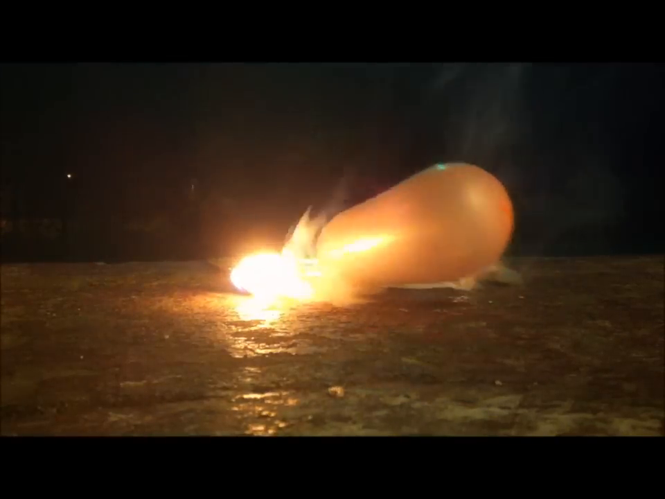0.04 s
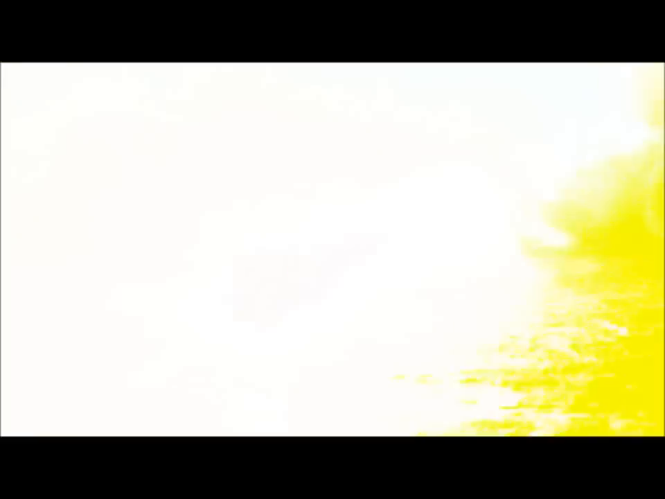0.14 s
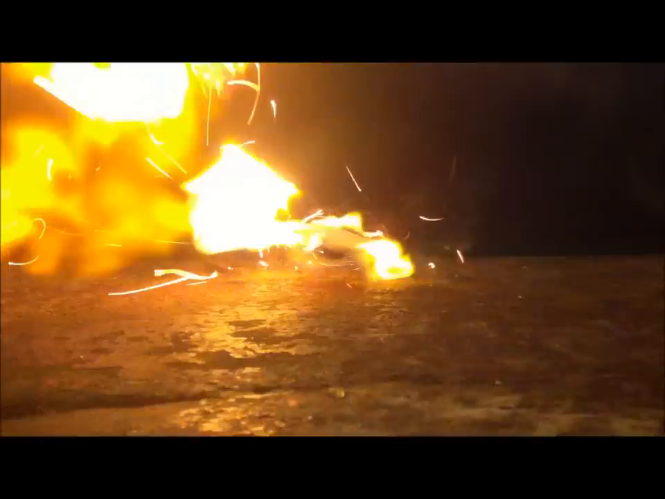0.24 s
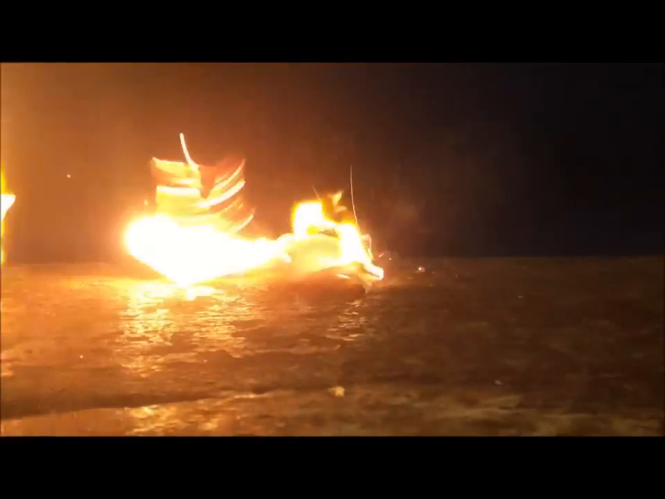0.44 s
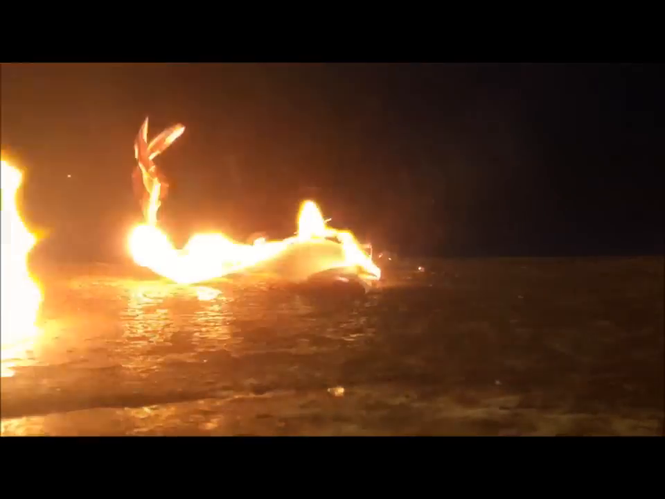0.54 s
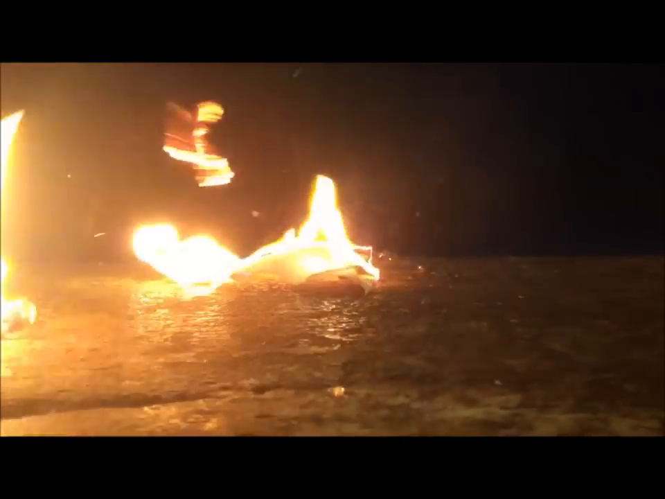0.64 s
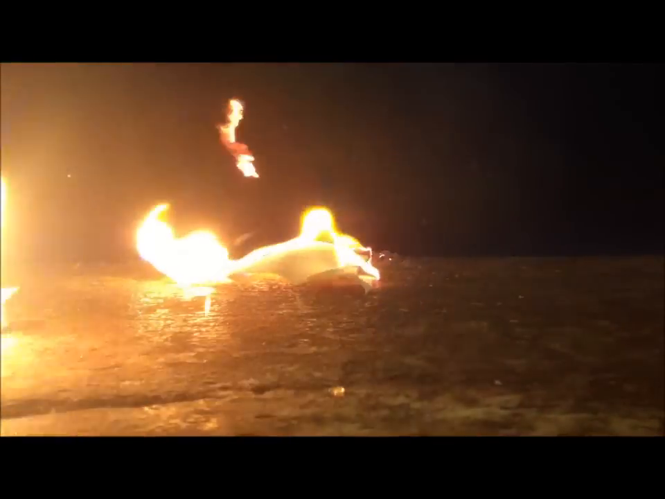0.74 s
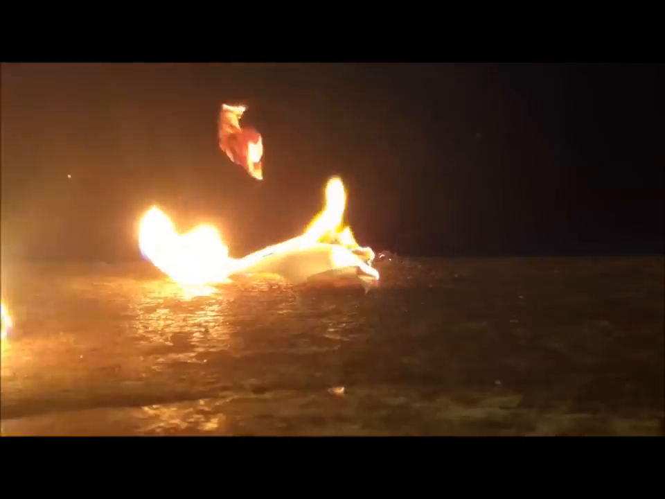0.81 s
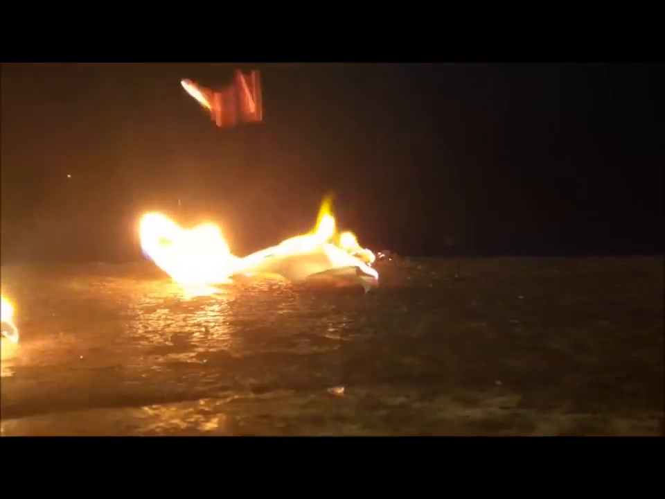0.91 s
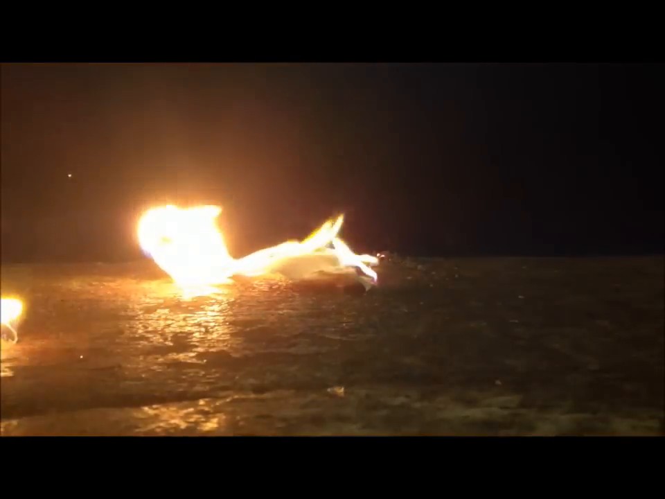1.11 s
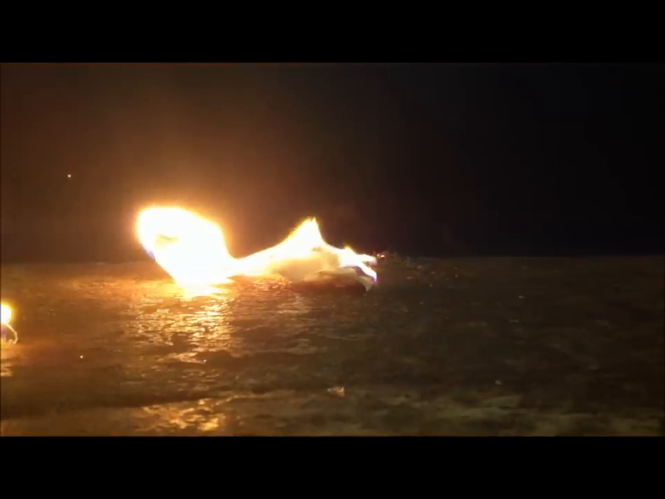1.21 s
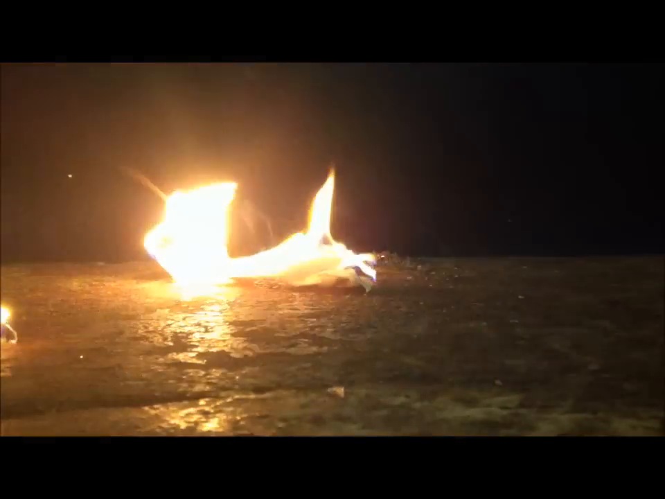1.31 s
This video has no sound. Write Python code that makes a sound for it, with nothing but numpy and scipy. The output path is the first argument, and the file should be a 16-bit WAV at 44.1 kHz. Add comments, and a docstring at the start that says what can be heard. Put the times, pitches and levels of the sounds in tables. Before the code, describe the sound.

A gas balloon explosion in a paved yard: quiet hiss, a sudden cracking bang overloading the microphone, rapid muffled slapbacks and a hollow rumble dying away, then weak low flame flutter as the ducked hiss slowly returns.

```python
"""Microphone hiss over a trace of low flame noise, then a gas balloon bursts into a fireball on wet paving at night.
The skin rips as a decaying sine, noise spits brightly, and push-and-suction pulses overload the microphone.
Walls throw back duller pulses; resonators ring on them, and shaped noise makes the yard's dull tail.
Burning rags flutter as low noise on a level curve.
The gain control ducks everything just ahead of the burst and slowly lets it back."""
import sys
import numpy as np
from scipy import signal
from scipy.io import wavfile
from scipy.ndimage import uniform_filter1d

SR = 44100
rng = np.random.default_rng(int(sys.argv[2]) if len(sys.argv) > 2 else 0)


def generate_wav(signal):
    """Clip the signal to [-1, 1] and save it as 16-bit WAV at the path in sys.argv[1]."""
    frames = np.transpose(np.atleast_2d(signal))
    scaled = np.clip(frames, -1, 1) * 32767
    pcm = np.round(scaled).astype(np.int16)
    wavfile.write(sys.argv[1], SR, pcm)


def to_linear_factor(level_db):
    """Convert decibel levels (scalar or array-like) to linear amplitude factors."""
    exponent = np.asarray(level_db, float) / 20
    return 10 ** exponent


N = 59535  # samples

# microphone hiss spectrum, relative: hz, density_db_per_hz
HISS_SPECTRUM = [(35, -27), (60, -18.5), (116, -7.5), (240, -1.5), (412, -5), (1500, -12), (4000, -14),
                 (9000, -18), (13000, -19.5), (16500, -14.5)]
# flame noise spectrum, relative: hz, density_db_per_hz
FLAME_SPECTRUM = [(35, -36), (60, -26.5), (136, -3.5), (179, -0.5), (254, -10.5), (332, -22), (841, -31),
                  (1500, -32.5), (1950, -61), (3300, -120)]
# flutter of the burning rags, before the hum and gain control: time_s, level_db
FLUTTER_CURVE = [(0, -73), (0.148, -74), (.24, -64.5), (.45, -40.5), (0.498, -49), (0.561, -46.5),
                 (0.621, -53.5), (.685, -48), (.73, -54.5), (.81, -51), (0.869, -62.5), (.93, -56.5),
                 (0.961, -65.5), (1.031, -53), (1.08, -70), (1.144, -55.5), (1.201, -73), (1.25, -62.5),
                 (1.35, -71)]
# pressure fronts (skin rips, gas bursts and ignites in steps, ground bounce), before filters:
# start_s, drive_db, push_s, rise_s
PRESSURE_FRONTS = [(.2388, 17.5, 0.00018, 0.0002), (.2396, 24, 0.0014, 0.00061),
                   (.2405, 18, 0.0017, 0.00033), (.242, 32, 0.00054, .001), (.243, 30.5, .0015, 0.0018),
                   (.245, 18, .004, .0001)]
# thumps thrown back by walls, before filters: start_s, drive_db, push_s, rise_s
WALL_THUMPS = [(.249, 9.5, 0.0015, .002), (.2552, 21.5, .0008, .002), (.262, 4.5, 0.0024, .002),
               (.269, 2.5, .0015, .0005), (.2825, -7.5, 0.0024, .0005), (.2925, 4.5, 0.0011, 0.00057),
               (.311, 1, 0.002, 0.0012), (.329, -11, .002, 0.00041), (.378, 0, 0.00068, 0.00075)]
# lasting rings of the yard: pitch_hz, width_hz, gain_db
YARD_RINGS = [(162.62, 6, 4), (231, 20, -6), (258, 30, -6), (403, 19, -6), (445, 8, -7), (549, 10, -13.5),
              (920, 6.9, -13)]
# reverberant tail spectrum, relative, before decay: hz, density_db_per_hz
TAIL_SPECTRUM = [(60, -26.5), (122, -18.5), (160, -11), (255, -3), (382, -4), (583, -16.5), (891, -22),
                 (1500, -35.5), (2500, -42), (4000, -57), (8000, -77), (16000, -89.5)]
# tail decay: hz, t60_s
TAIL_DECAY = [(70, 0.17), (165, 0.64), (400, 0.22), (900, 0.51), (2000, .3), (5000, .15), (12000, .06)]

HISS_DB = -65.5
FLAME_HUM_HZ, FLAME_HUM_WIDTH_HZ, FLAME_HUM_DB = 166, 18, -7
RIP_HZ, RIP_T60_S, RIP_DB = 2150, 0.017, -4.5
SPIT_HZ, SPIT_WIDTH_HZ, SPIT_GAIN_DB, SPIT_RISE_S, SPIT_T60_S = 3660, 4000, -23, .007, .01
FRONT_DULL_HZ, THUMP_DULL_HZ = 2800, 900  # low-passes: fronts arrive rounded
THIN_HZ = 130  # high-pass: a small fireball pushes little deep bass
BOOM_HZ, BOOM_WIDTH_HZ, BOOM_DB = 185, 400, -5.5
TAIL_START_S, TAIL_RISE_S, TAIL_GAIN_DB, TAIL_PATCHY_DB = .246, .006, -13.5, 3.5
KNEE_DB, SQUEEZE_DB_PER_DB = -21, 0.38
SENSE_S, AHEAD_S, FALL_S, RECOVER_S = .002, .014, 0.00086, 0.99
LOW_CUT_HZ, TOP_HZ, CIRCUIT_DB = 78, 15800, -86


def read(points, hz):
    """Reads a table on a log-frequency axis."""
    table_hz, value = np.transpose(points)
    return np.interp(np.log(hz + 1), np.log(table_hz + 1), value)


def low(x, hz, order):
    """Butterworth low-pass."""
    return signal.sosfilt(signal.butter(order, hz, fs=SR, output="sos"), x)


def high(x, hz, order):
    """Butterworth high-pass."""
    return signal.sosfilt(signal.butter(order, hz, "high", fs=SR, output="sos"), x)


def resonate(x, hz, width_hz):
    """A resonance of gain 1: shift to 0 Hz, one-pole smoothing, shift back."""
    turn = np.exp(2j * np.pi * hz * np.arange(len(x)) / SR)
    r = np.exp(-np.pi * width_hz / SR)
    return 2 * (turn * signal.lfilter([1 - r], [1, -r], x / turn)).real


def noise(spectrum, size, patchy_db=0, decay=None):
    """Random short-time spectra, rms 1 before an optional per-frequency decay from the tail start."""
    hop = size // 4
    frames, hz = N // hop + 5, np.fft.rfftfreq(size, 1 / SR)
    real, imag, patches = rng.standard_normal((frames, len(hz), 3)).T
    patches = uniform_filter1d(patches, size=4, axis=0)
    patches = uniform_filter1d(patches, size=3, axis=1)
    level_db = read(spectrum, hz)[:, None] + patchy_db * patches / patches.std()
    z = (real + 1j * imag) * to_linear_factor(level_db)
    scale = signal.istft(z, nperseg=size, noverlap=size - hop)[1].std()
    if decay:
        age_s = np.maximum(np.arange(frames) * hop / SR - TAIL_START_S, 0)
        z = z * to_linear_factor(-60 * age_s / read(decay, hz)[:, None])
    return signal.istft(z, nperseg=size, noverlap=size - hop)[1][:N] / scale


def hiss():
    """Steady, slightly patchy microphone noise."""
    return to_linear_factor(HISS_DB) * noise(HISS_SPECTRUM, size=2048, patchy_db=0.75)


def flames():
    """Low noise of the burning rags, humming around one pitch, lumpy by its level curve."""
    time_s, level_db = np.transpose(FLUTTER_CURVE)
    roar = noise(FLAME_SPECTRUM, size=2048)
    roar = roar + to_linear_factor(FLAME_HUM_DB) * resonate(roar, FLAME_HUM_HZ, FLAME_HUM_WIDTH_HZ)
    return to_linear_factor(np.interp(np.arange(N) / SR, time_s, level_db)) * roar


def burst_age_s():
    """Time since the first front, 0 before it."""
    return np.maximum(np.arange(N) / SR - PRESSURE_FRONTS[0][0], 0)


def tearing_skin():
    """The tearing skin rings briefly: a decaying sine."""
    age_s = burst_age_s()
    return to_linear_factor(RIP_DB - 60 * age_s / RIP_T60_S) * np.sin(2 * np.pi * RIP_HZ * age_s)


def gas_spit():
    """Bright spit of the burning gas: broadly resonant noise, linear rise, fast decay."""
    age_s = burst_age_s()
    white = rng.standard_normal(N)
    spit = resonate(white, SPIT_HZ, SPIT_WIDTH_HZ) + .15 * white
    rise = np.minimum(age_s / SPIT_RISE_S, 1)
    fall_db = -60 * np.maximum(age_s - SPIT_RISE_S, 0) / SPIT_T60_S
    return spit * rise * to_linear_factor(SPIT_GAIN_DB + fall_db)


def pushes(rows):
    """Each row is a quick push followed by a longer suction."""
    t, out = np.arange(N) / SR, np.zeros(N)
    for start_s, drive_db, push_s, rise_s in rows:
        age_s = np.maximum(t - start_s, 0)
        rise = 1 - np.exp(-age_s / rise_s)
        out += to_linear_factor(drive_db) * rise * (1 - age_s / push_s) * np.exp(-age_s / push_s)
    return out


def fronts_and_thumps():
    """Rounded pressure fronts and duller wall thumps, thinned in the bass."""
    fronts = low(pushes(PRESSURE_FRONTS), FRONT_DULL_HZ, order=8)
    thumps = low(pushes(WALL_THUMPS), THUMP_DULL_HZ, order=4)
    return high(fronts + thumps, THIN_HZ, order=3)


def boom(pressure):
    """Broad low resonance excited by every front and thump."""
    return to_linear_factor(BOOM_DB) * resonate(pressure, BOOM_HZ, BOOM_WIDTH_HZ)


def yard_rings(pressure):
    """Narrower yard resonances excited by every front and thump."""
    return sum(to_linear_factor(gain_db) * resonate(pressure, hz, width_hz) for hz, width_hz, gain_db in YARD_RINGS)


def blast():
    """The skin, the spit, the pressure pulses and the resonances they excite."""
    pressure = fronts_and_thumps()
    return tearing_skin() + gas_spit() + pressure + boom(pressure) + yard_rings(pressure)


def tail():
    """Scattered reflections of the yard: patchy noise, the high treble dying fastest."""
    rise = np.clip((np.arange(N) / SR - TAIL_START_S) / TAIL_RISE_S, 0, 1)
    scatter = noise(TAIL_SPECTRUM, size=1024, patchy_db=TAIL_PATCHY_DB, decay=TAIL_DECAY)
    return to_linear_factor(TAIL_GAIN_DB) * rise * scatter


def scene():
    """The mono mix."""
    return (hiss() + flames() + blast() + tail())[None]


def gain_control(x):
    """Looks ahead, ducks by a share of the dB over the knee; the cut in dB decays exponentially."""
    power_db = 10 * np.log10(abs(uniform_filter1d(x ** 2, round(SENSE_S * SR))) + 1e-12)
    ahead_db = np.roll(power_db, -round(AHEAD_S * SR))
    log_over = np.log(np.maximum(ahead_db - KNEE_DB, 1e-3))
    slope = np.arange(N) / SR / RECOVER_S
    # running maximum in the log domain = peak hold with exponential release
    cut_db = SQUEEZE_DB_PER_DB * np.exp(np.maximum.accumulate(log_over + slope) - slope)
    r = np.exp(-1 / (FALL_S * SR))
    return x / to_linear_factor(signal.lfilter([1 - r], [1, -r], cut_db))


def overload(x):
    """Linear to half scale, then tanh saturation towards full scale."""
    bent = np.sign(x) * (.5 + .5 * np.tanh(2 * abs(x) - 1))
    return np.where(abs(x) > .5, bent, x)


def low_pass(x):
    """Removes everything above the highest recorded frequency."""
    return signal.sosfilt(signal.butter(12, 16950, fs=SR, output="sos"), x)


def record(dry):
    """Gain control, low cut, circuit noise, soft overload, band limit."""
    x = high(gain_control(dry[0]), LOW_CUT_HZ, order=4)
    x = x + to_linear_factor(CIRCUIT_DB) * rng.standard_normal(N)  # not ducked
    mix = low(overload(x), TOP_HZ, order=8)[None]
    return low_pass(mix)


dry = scene()
out = record(dry)
generate_wav(out)
```